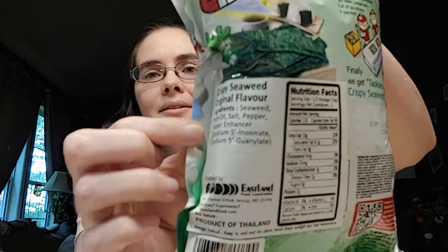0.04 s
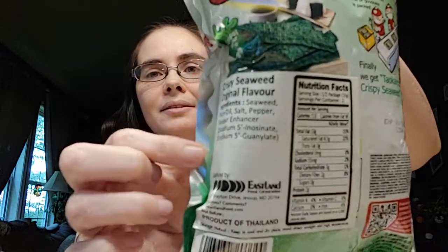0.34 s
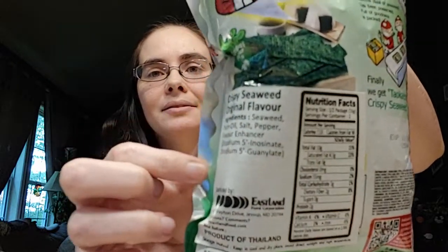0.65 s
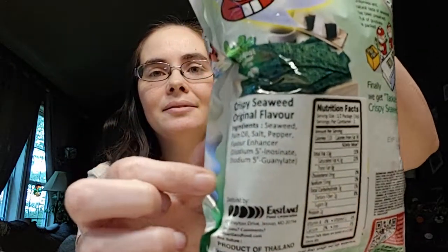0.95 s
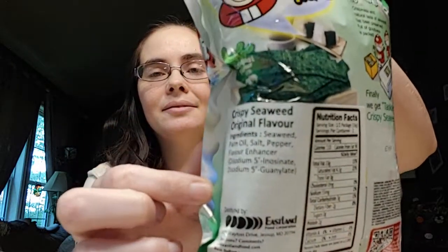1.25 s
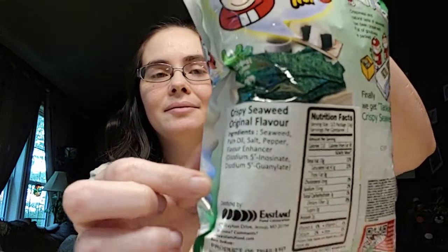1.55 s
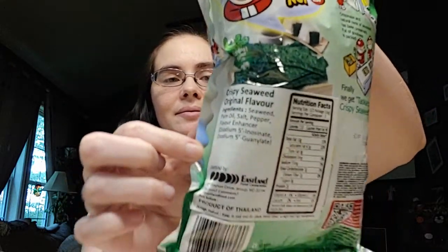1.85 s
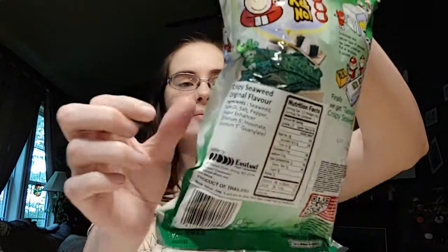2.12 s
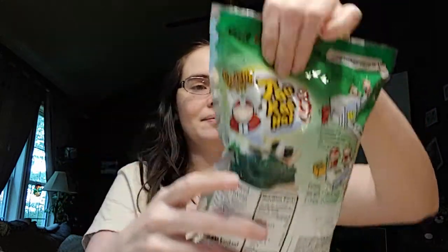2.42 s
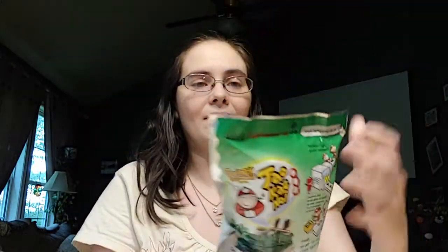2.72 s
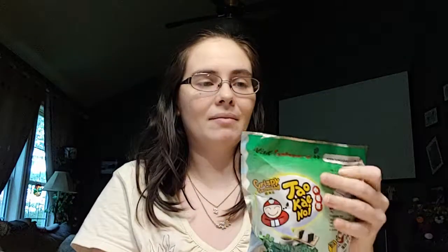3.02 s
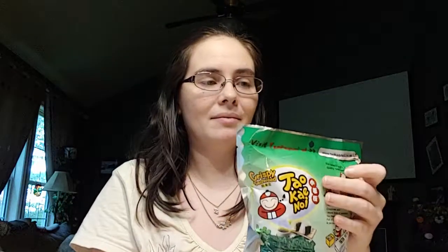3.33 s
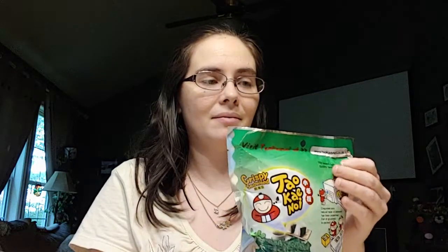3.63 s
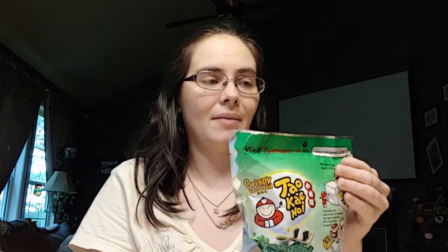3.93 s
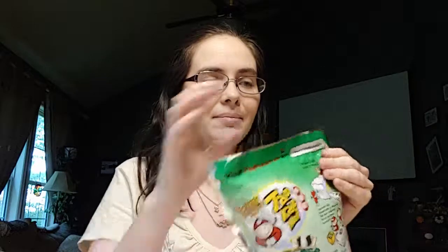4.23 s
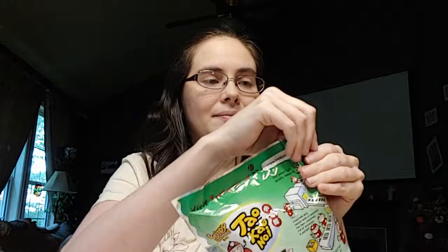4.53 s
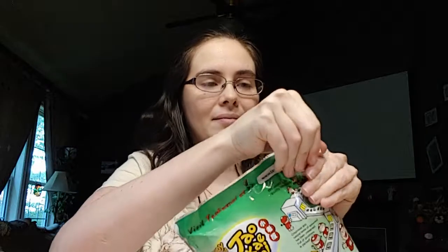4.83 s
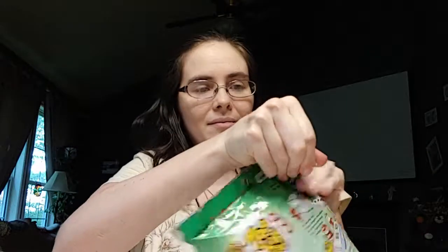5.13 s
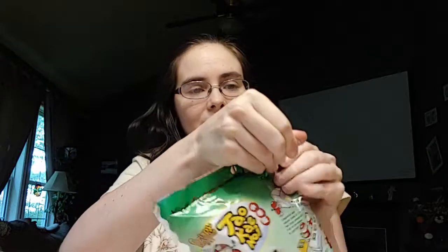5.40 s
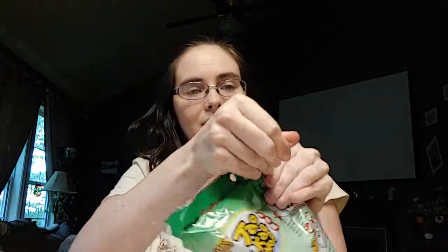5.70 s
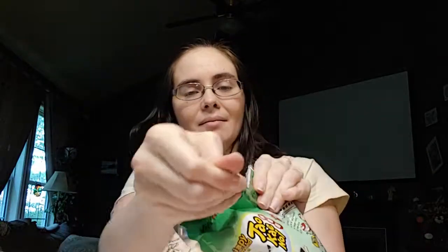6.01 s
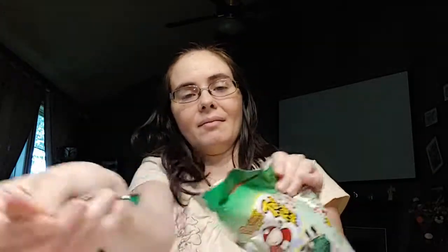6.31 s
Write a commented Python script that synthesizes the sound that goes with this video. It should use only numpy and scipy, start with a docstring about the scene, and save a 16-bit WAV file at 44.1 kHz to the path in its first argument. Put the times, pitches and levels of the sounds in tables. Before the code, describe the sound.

A foil snack bag is handled close to the microphone in a quiet living room. A few faint ticks and finger slides come first, then short bursts of crinkling as the bag is turned over. After a brief lull, the hands grip the top and pull it open in a longer, louder run of sharp snaps and fine crackle, with soft hollow flaps. A faint low rumble lies underneath.

```python
"""A foil snack bag is turned over close to the microphone, then gripped and pulled open at the top.
Fingers slide over the stiff film, its creases buckle in single snaps and runs of fine crackle,
and the slack panels flap against the air inside. The living room adds echoes and a low rumble.
Two microphone openings (ports), left and right, pick it all up, each with its own tone."""
import sys
import numpy as np
from scipy import signal
from scipy.fft import rfft, irfft
from scipy.io import wavfile
from scipy.ndimage import uniform_filter1d

SR = 44100
rng = np.random.default_rng(int(sys.argv[2]) if len(sys.argv) > 2 else 0)


def unload_audio(sound):
    """Save the sound as a 16-bit wav file, at the path given as the first command line argument."""
    columns = np.transpose(np.atleast_2d(sound))
    # keep every value between -1 and 1, then stretch to whole-number steps
    steps = np.round(np.clip(columns, -1, 1) * 32767)
    wavfile.write(sys.argv[1], SR, steps.astype(np.int16))


N = 284886
TIME = np.arange(N) / SR
# the hands squeeze or pull the bag: start_s, length_s, crackle_db, flapping_db
GRIPS = [(2.044, 0.024, -33.5, -34.5), (2.41, 0.12, -38.5, -51), (2.51, 0.037, -27.5, -29.5),
         (2.93, 0.19, -46.5, -52), (3.255, .02, -48.5, -72), (4.036, 0.017, -30.5, -49),
         (4.12, 0.037, -31, -54), (4.23, 0.21, -60, -62), (4.385, 0.13, -45, -51.5), (4.61, 0.06, -41, -61),
         (4.695, 0.035, -30, -52), (4.87, 0.0089, -29, -30), (4.945, 0.012, -33, -52),
         (5.075, 0.052, -39, -67), (5.17, 0.091, -22, -48), (5.48, 0.068, -35.5, -48),
         (5.563, 0.029, -31, -42), (5.64, 0.039, -25.5, -39), (5.79, 0.12, -36, -47),
         (5.857, 0.081, -22, -24), (5.995, 0.053, -31.5, -42), (6.238, 0.054, -23, -20),
         (6.37, 0.063, -41, -56.5)]


def from_db(db):
    """Turn decibels into a number to multiply a sound by."""
    return 10 ** (np.asarray(db) / 20)


def rms_one(x):
    """Scale a sound so that its average power is one."""
    return x / np.sqrt(np.mean(x ** 2) + 1e-20)


def at_hz(points, hz, column=1):
    """Read between the rows of a table, with every octave equally wide."""
    points = np.array(points)
    return np.interp(np.log(np.maximum(hz, 1)), np.log(points[:, 0]), points[:, column])


def colour(x, spectrum, size=4096):
    """Make each pitch louder or softer as a table says (a minimum-phase filter)."""
    cepstrum = irfft(np.log(from_db(at_hz(spectrum, np.fft.rfftfreq(size, 1 / SR)))))
    # folding makes the filter ring only after a sound, never before it
    cepstrum[1:size // 2] *= 2
    cepstrum[size // 2 + 1:] = 0
    response = irfft(np.exp(rfft(cepstrum)))
    return signal.fftconvolve(np.atleast_2d(x), response[None], axes=1)[:, :x.shape[-1]]


def diffuse_noise(size):
    """Stereo hiss, partly alike at both ports in the bass and unrelated in the treble."""
    # how alike left and right are: pitch_hz, likeness (0 to 1)
    likeness = [(35, 0.41), (150, 0.62), (400, 0.35), (1000, 0.049), (2500, 0), (8000, 0)]
    mid, side = rfft(rng.standard_normal((2, size)))
    alike = at_hz(likeness, np.fft.rfftfreq(size, 1 / SR))
    return rms_one(irfft(np.sqrt(1 + alike) * mid + np.sqrt(1 - alike) * side * [[1], [-1]], size))


def hand_effort(moves, column, attack_s, settle_db,
                tighten_db=1.5, release_db_per_s=600, settle_db_per_s=115):
    """The hands take hold, tighten and let go; the crumpled film goes on settling, more faintly."""
    power = np.zeros(N)
    for move in moves:
        start, length = move[:2]
        attack = np.clip(1 + (TIME - start) / attack_s, 0, 1) ** 2
        slack = np.clip(1 - (TIME - start) / length, 0, 1)
        after = np.maximum(TIME - start - length, 0)
        release_db = np.maximum(-release_db_per_s * after, settle_db - settle_db_per_s * after)
        power += (attack * from_db(move[column] - tighten_db * slack + release_db)) ** 2
    return np.sqrt(power)


def room_rumble(gain_db=-63.5):
    """The quiet room: a low rumble with a few faint tones, a little louder on the left."""
    # tone of the rumble: pitch_hz, level_db
    rumble_tone = [(20, -13), (55, 4.5), (110, -1.5), (220, -0.5), (305, -7), (365, -4.5), (480, -9),
                   (800, -13), (1450, -22.5), (3200, -29.5), (5800, -35), (7200, -34.5), (8500, -50.5),
                   (11500, -39.5), (15500, -46.5)]
    # steady tones: pitch_hz, level_db
    tones = [(366, -79), (770, -82.5), (3607, -98)]
    rumble = from_db(gain_db) * rms_one(colour(diffuse_noise(N), rumble_tone))
    hum = sum(np.sqrt(2) * from_db(db) * np.sin(2 * np.pi * (hz * TIME + rng.random()))
              for hz, db in tones)
    return (rumble + hum) * from_db([[2.0], [-1.5]])


def finger_slides(grain_db=0.5, catch_db=5.0, gain_db=-4.5):
    """Skin drags over the film in countless small slips, catching and freeing as it goes."""
    # finger strokes: start_s, length_s, level_db
    strokes = [(.1, 0.098, -52.5), (.335, 0.077, -54.5), (1.73, 0.074, -74.5), (2.02, 0.043, -33.5),
               (2.41, 0.12, -53), (2.8, 0.043, -52), (2.925, 0.11, -54), (4.033, 0.12, -54)]
    # tone of skin on film: pitch_hz, level_db
    skin_tone = [(200, -12.5), (700, 13.5), (1300, 9.5), (2500, 0.5), (5000, -5.5), (7500, -2.5),
                 (12000, -6.5), (16000, -16)]
    grain, catch = (np.interp(TIME * per_s, np.arange(7 * per_s), rng.standard_normal(7 * per_s))
                    for per_s in (900, 60))
    slips = diffuse_noise(N) * from_db(grain_db * grain + catch_db * catch)
    effort = hand_effort(strokes, column=2, attack_s=.01, settle_db=-22.5)
    return rms_one(colour(slips, skin_tone)) * effort * from_db(gain_db)


CREASE_RUN_S = .002   # time a crease takes to cross one small flat patch of film


def film_pop(main_hz, body_db, crack_db, main_octaves=0.12, ring_s=0.0023, uneven_db=3.5,
             port_lag_s=.0001, count=72, size=1100):
    """A patch of film flips over and rings briefly at many pitches (modes), most near its main one."""
    # tone of the film: pitch_hz, level_db
    film_tone = [(90, -18.5), (250, -7), (600, 4), (1000, 1), (2000, 0.5), (3000, -2), (5000, -7.5),
                 (7000, -10.5), (12000, -19.5), (16000, -25.5)]
    spread = (np.arange(count) + rng.random(count)) / count
    hz = (np.sqrt(130) + (np.sqrt(16000) - np.sqrt(130)) * spread) ** 2
    hz[np.argmin(np.abs(hz - main_hz))] = main_hz
    near_main = 1 / (1 + (np.log2(hz / main_hz) / main_octaves) ** 2)
    stretch = np.exp(0.74 * (1 - near_main) * rng.standard_normal(count) + 0.43 * near_main)
    decay_s = ring_s * (hz / 1000) ** -0.25 * stretch
    main_db = 9.5 + 0.52 * np.clip(-crack_db, 0, 20)   # a soft push leaves little but a hollow pop
    tilt_db = at_hz([(500, body_db), (1200, 0), (2000, 0), (4500, crack_db)], hz)
    mode_db = at_hz(film_tone, hz) + tilt_db + main_db * near_main
    mode_db += uneven_db * (1 - near_main) * rng.standard_normal(count)
    strength = from_db(mode_db) * np.sqrt(np.sqrt(hz) / decay_s)
    # the modes start one after another as the crease runs across
    age = np.maximum(np.arange(size) / SR - CREASE_RUN_S * rng.beta(2, 2, count)[:, None], 0)
    envelope = strength[:, None] * np.exp(-age / decay_s[:, None]) * (1 - np.exp(-2 * age * hz[:, None]))
    modes = envelope * np.exp(2j * np.pi * (hz[:, None] * age + rng.random((count, 1))))
    # the left port is nearer, and short waves spread differently towards each port
    skew = np.pi * hz * port_lag_s + 0.86 * np.sqrt(hz / 5000) * rng.standard_normal(count)
    ports = np.exp(1j * skew * [[1], [-1]])
    # low body, middle and high crack each take their share of the energy
    out, grid_hz = 0, np.arange(100, 16000, 50)
    film_power = from_db(at_hz(film_tone, grid_hz)) ** 2
    zone, grid_zone = np.digitize(hz, [800, 3000]), np.digitize(grid_hz, [800, 3000])
    for k, level_db in enumerate((body_db, 0, crack_db)):
        part = (ports[:, zone == k] @ modes[zone == k]).real
        share = film_power[grid_zone == k].sum() / film_power[grid_zone == 1].sum()
        out = out + rms_one(part) * np.sqrt(share) * from_db(level_db)
    return out


def add(track, sound, start_s):
    """Mix a stereo sound into a track at the given time."""
    start = int(np.clip(start_s * SR, 0, N - 1))
    track[:, start:start + sound.shape[1]] += sound[:, :N - start]


def crease_snaps(gain_db=-8.0):
    """Each large crease buckles with a pop of its own."""
    # large creases: start_s, level_db, pitch_hz, body_db (extra below 800 Hz),
    # crack_db (extra above 3000 Hz), left_minus_right_db
    creases = [(0.129, -35.5, 1137, -8.5, -52, 0.5), (.223, -58, 870, 6.5, -20, 1.5),
               (.499, -47, 964, -12, -12.5, 9), (.719, -54, 6720, 2.5, 8.5, 2),
               (1.013, -48.5, 1040, -4.5, -12.5, 7.5), (1.802, -67.5, 435, -10, 3, -4),
               (2.049, -30, 850, -9, -28, 14), (2.061, -22, 6140, 1.5, 1, 2.5),
               (2.101, -29.5, 846, -4, -15, 6), (2.244, -43, 1170, 0, -28, 0),
               (2.276, -47, 6170, -4, 1.5, -1), (2.375, -45.5, 1170, -17, -9.5, 4.5),
               (2.416, -34.5, 1024, -13, -13, 2), (2.465, -34.5, 1190, -20, -13, 2),
               (2.483, -31, 1185, -2, -15, -3), (2.514, -24.5, 617, 2, -3, 6.5),
               (2.522, -28, 1250, -12, -10, 7), (2.538, -18.5, 1810, 1.5, 4, 0.5),
               (2.553, -22.5, 2284, 0, -16, 8), (2.698, -48, 1890, -15, -16, -3),
               (2.726, -48, 553, 5, -31, -5.5), (3.001, -34.5, 1970, -1.5, -11, 6),
               (3.032, -40, 795, 4.5, -7, -1), (3.085, -31, 1900, -6, -1, 5.5),
               (3.261, -41.5, 1020, -5.5, 1, 0.5), (3.312, -49.5, 6820, 3.5, 4.5, -0.5),
               (3.523, -46.5, 647, 6.5, -13, 5.5), (3.991, -60, 835, 3, 1, 3),
               (4.030, -30, 7240, 3.5, 6, 1.5), (4.085, -33, 4360, -7, 2.5, 1),
               (4.095, -38.5, 4300, 9, 7, 3), (4.132, -26.5, 6990, -0.5, 4.5, 3.5),
               (4.152, -35, 2980, 2.5, 0, 3), (4.169, -35, 4430, -8, 8.5, -1),
               (4.380, -33.5, 2180, 2.5, 6, -1), (4.422, -40, 2000, -20, -12, 9),
               (4.449, -34.5, 633, 0.5, -4.5, -1), (4.578, -37, 2680, -2, -8, 0),
               (4.608, -29.5, 633, -0.5, -9.5, 1.5), (4.646, -29.5, 1176, -4, -10.5, 2.5),
               (4.689, -30.5, 3500, 1.5, 4, -1), (4.733, -16.5, 3960, -7.5, -19, 6),
               (4.737, -23.5, 3870, 0, 13.5, 1), (4.817, -28.5, 5230, -27, 5, 2),
               (4.870, -21.5, 3610, 4, 3.5, 1), (4.901, -32.5, 1700, 3, -12, 5),
               (4.962, -27, 4440, -4.5, -2, -3), (4.968, -35, 3930, -19, 2, 14),
               (5.039, -27, 1694, -3.5, -2.5, 2), (5.074, -24, 3280, -8, 1.5, 4),
               (5.168, -18, 1470, -9.5, -3.5, 4), (5.177, -22, 4630, -1.5, 4.5, 2.5),
               (5.185, -24.5, 4100, 0, 6.5, -6), (5.215, -24.5, 3260, 3, 6.5, -6.5),
               (5.233, -29, 7800, 9.5, 14.5, 10), (5.243, -15.5, 2250, 1.5, -3.5, -2),
               (5.293, -27.5, 2530, 3.5, 0.5, -0.5), (5.374, -34.5, 1840, 5, -5, -0.5),
               (5.406, -38.5, 5950, 8.5, 12, 2.5), (5.432, -33.5, 2340, -6, -4.5, -4.5),
               (5.449, -39.5, 2610, -14, -4, 16), (5.472, -34, 730, 5, -6, -6), (5.496, -34, 665, 0, -5, 3),
               (5.521, -31.5, 1510, 2, -3, -5), (5.534, -30.5, 4180, 5.5, 2.5, -0.5),
               (5.564, -28.5, 2080, -20, -5, -7), (5.569, -20.5, 3410, -6.5, 0.5, 1.5),
               (5.583, -30, 640, 8, 2, 3), (5.595, -26, 3330, -20, -2, 3), (5.645, -23, 4120, 3.5, 6, 3.5),
               (5.665, -19.5, 1610, -2, -7, 2), (5.688, -20, 694, 4.5, 1.5, -2.5),
               (5.797, -26, 5500, -16, 9.5, -1.5), (5.822, -30, 2780, -9, 8.5, -1.5),
               (5.855, -18, 2070, -7, 3, 1.5), (5.875, -13.5, 2064, 0.5, 3, -0.5),
               (5.891, -17, 2140, -2.5, 3, -1.5), (5.913, -30, 2170, -2, -3, -8),
               (5.932, -19.5, 1390, -16, -15, 3), (5.995, -23.5, 2610, -8, -1, 4),
               (6.019, -25.5, 2060, -4, 0, -2), (6.035, -23.5, 2100, -5.5, 3, -0.5),
               (6.131, -38.5, 2250, -7, -1.5, 0), (6.203, -25, 2085, -15.5, -9, 2),
               (6.237, -31.5, 435, 9.5, 8.5, 10), (6.262, -34, 433, 11.5, 12.5, 2),
               (6.287, -19.5, 1885, 4.5, -21, 0), (6.314, -41, 420, 14.5, 6.5, 5),
               (6.361, -32.5, 673, -1, -5.5, 2.5)]
    out = np.zeros((2, N))
    for start_s, level_db, pitch_hz, body_db, crack_db, pan_db in creases:
        gains = from_db(level_db + gain_db + np.array([[pan_db], [-pan_db]]) / 2)
        add(out, film_pop(pitch_hz, body_db, crack_db) * gains, start_s - CREASE_RUN_S / np.pi)
    return out


def fine_crackle(per_s=620, size_db=4.0, even_s=0.032, firm_db=-30, gain_db=-3.5, count=48):
    """Tiny creases pop at random, many weak, a few strong; a harder grip is louder and crisper."""
    pitches, tints_db = np.geomspace(500, 7500, count), 1.5 * rng.standard_normal((count, 2))
    shapes = [film_pop(hz, body_db - 2, crack_db - .5)
              for hz, (body_db, crack_db) in zip(pitches, tints_db)]
    starts = np.flatnonzero(rng.random(N) < per_s / SR)
    sizes = from_db(size_db * np.minimum(rng.exponential(1, N), 4))
    picks = rng.integers(0, count, N)
    pops = np.zeros((2, N))
    for i in starts:
        add(pops, shapes[picks[i]] * sizes[i], i / SR)
    # even out the stream so that the hands set its loudness
    power = uniform_filter1d(np.mean(pops ** 2, axis=0), int(even_s * SR) + 1)
    pops /= np.sqrt(np.abs(power) + 1e-6)
    effort = hand_effort(GRIPS, column=2, attack_s=0.025, settle_db=-11)
    dull = signal.sosfilt(signal.butter(1, 2500, fs=SR, output="sos"), pops)
    crispness = np.clip((effort / from_db(firm_db)) ** 0.15, .5, 2)
    return (dull + crispness * (pops - dull)) * effort * from_db(gain_db)


def panel_flaps(per_s=260, gain_db=-8.0):
    """The slack panels jerk against the air in the bag: soft, low pushes."""
    # tone of a panel: pitch_hz, level_db
    panel_tone = [(40, -19), (80, -7), (125, -2.5), (170, -12), (225, 6), (450, 1), (650, 2), (900, -17),
                  (2000, -39)]
    jerks = (rng.random(N) < per_s / SR) * rng.standard_normal(N)
    effort = hand_effort(GRIPS, column=3, attack_s=.016, settle_db=-12)
    return rms_one(colour(jerks, panel_tone)) * effort * from_db(gain_db)


def standing_waves(t, fade_60_db_s=0.3):
    """The room's own low notes hum on briefly, the same at both ports."""
    # the room's notes: pitch_hz, level_db
    notes = [(123, -18), (233, -24), (300, -18), (433, -22)]
    fade = np.exp(-np.log(1000) * t / fade_60_db_s)
    return sum(from_db(db) * np.cos(2 * np.pi * hz * t) for hz, db in notes) * fade / np.linalg.norm(fade)


def room_echoes(x, build_s=0.0073, smear_s=0.00013, size=32768, bands=9):
    """Sound bounces off nearby surfaces, then leaves a tail that dies fastest in the high treble."""
    # the room's tail: pitch_hz, fade_60_db_s, level_db
    tail = [(100, 0.24, 0), (260, 0.59, -10), (700, 0.57, -10), (1840, 0.44, -11.5), (4860, 0.49, -12.5),
            (12800, 0.15, -11)]
    # bounces off nearby surfaces: delay_s, level_db
    bounces = [(.0064, -17.5), (.0115, -15), (.0142, -23), (.0345, -35.5), (0.0418, -28)]
    t, hz = np.arange(size) / SR, np.fft.rfftfreq(size, 1 / SR)
    noise, response = rfft(diffuse_noise(size)), np.zeros((2, size))
    centres = np.geomspace(60, 15000, bands)
    for centre, weights in zip(centres, np.eye(bands)):
        band = irfft(noise * at_hz(np.c_[centres, weights], hz))
        fade = np.exp(-np.log(1000) * t / at_hz(tail, centre)) * (1 - np.exp(-t / build_s))
        response += band * fade / np.linalg.norm(fade) * from_db(at_hz(tail, centre, column=2))
    for delay_s, level_db in bounces:
        smear = diffuse_noise(size) * (t > delay_s) * np.exp(-np.abs(t - delay_s) / smear_s)
        response += smear / np.linalg.norm(smear[0]) * from_db(level_db)
    return signal.fftconvolve(x, response + from_db(-9.5) * standing_waves(t), axes=1)[:, :N]


def scene(lowest_hz=72):
    """The bag and its room, heard through two ports that each favour their own pitches."""
    # the bag is drawn back from the microphone, so the echoes gain on it: time_s, echo_gain_db
    drawn_back = [(2.15, -4), (2.6, 0)]
    # tone of each port: pitch_hz, gain_db
    left_port = [(100, -1.5), (600, 1.5), (1350, -0.5), (1700, -5.5), (3600, -2.5), (4700, 0.5), (7000, -2),
                 (8000, -17), (9100, -14), (9800, -2), (10700, -10), (11700, 2.5), (12900, -20),
                 (16000, -32)]
    right_port = [(100, -4.5), (600, 1), (1100, -7.5), (2050, 3), (2900, -2), (3600, -2.5), (5000, -3.5),
                  (6000, -3.5), (7000, 5.5), (7700, 2), (8700, -16.5), (9700, -16.5), (11900, -7),
                  (13000, -14)]
    bag = crease_snaps() + fine_crackle() + panel_flaps() + finger_slides()
    # a small bag gives off no deep bass
    bag = signal.sosfilt(signal.butter(2, lowest_hz, "high", fs=SR, output="sos"), bag)
    echo_gain = from_db(np.interp(TIME, *np.transpose(drawn_back)))
    left, right = bag + room_echoes(bag * echo_gain)
    return np.vstack([colour(left, left_port), colour(right, right_port)]) + room_rumble()


def record(dry, cutoff_hz=15900):
    """The highest treble is cut off steeply."""
    return signal.sosfilt(signal.ellip(10, .2, 80, cutoff_hz, fs=SR, output="sos"), dry)


dry = scene()
out = record(dry)
unload_audio(out)
```